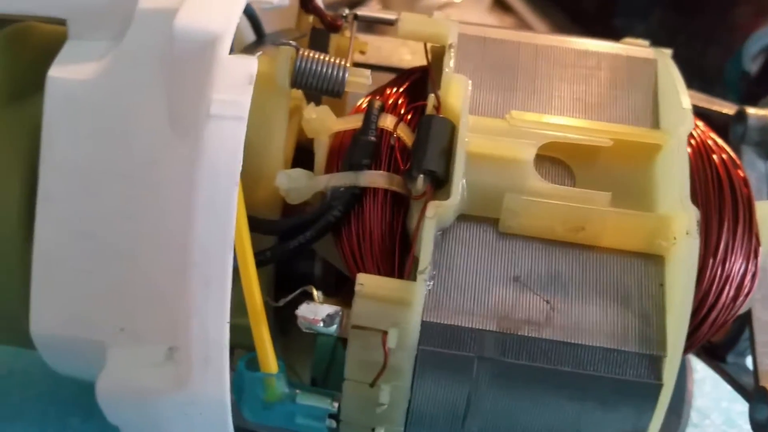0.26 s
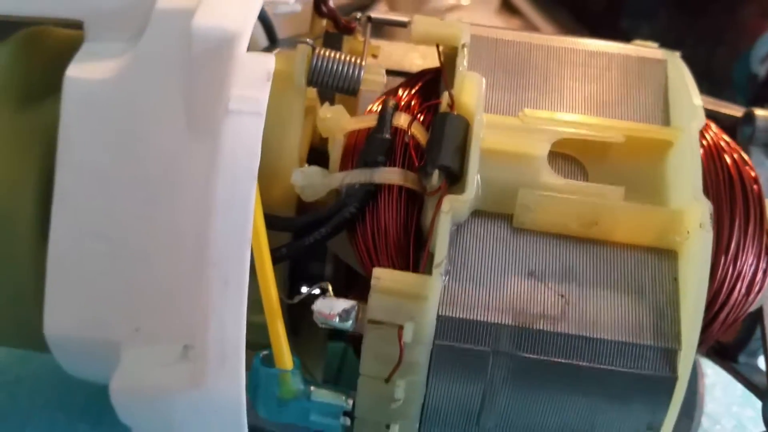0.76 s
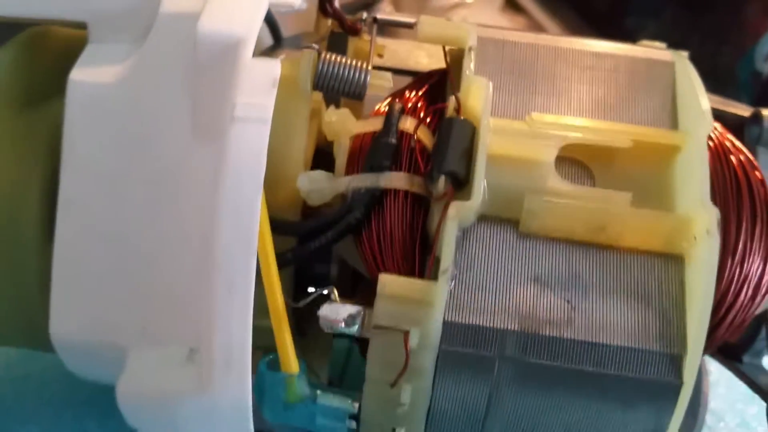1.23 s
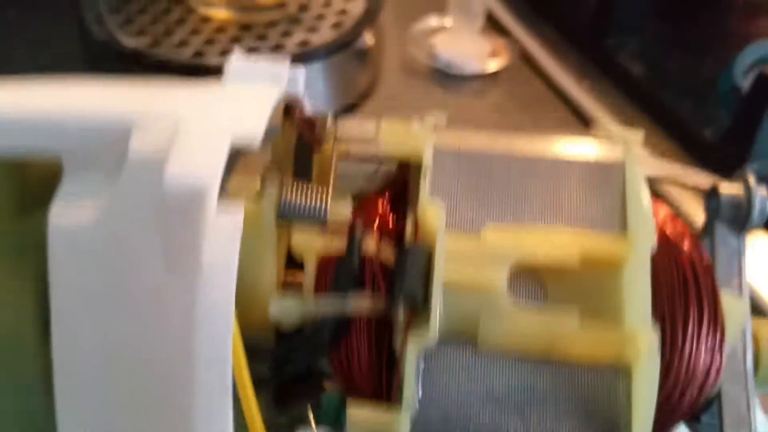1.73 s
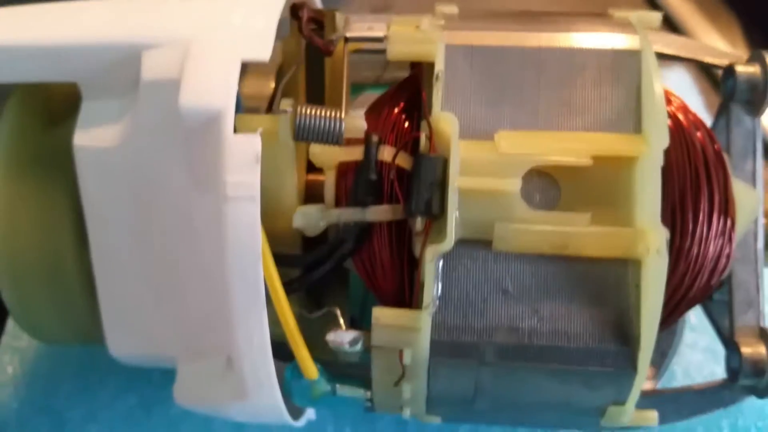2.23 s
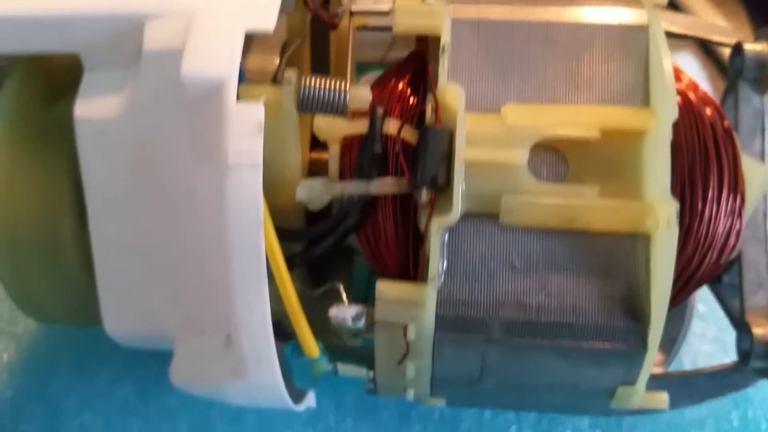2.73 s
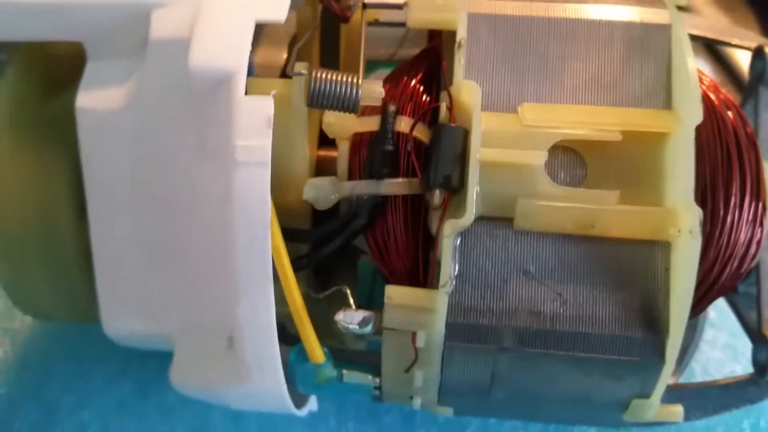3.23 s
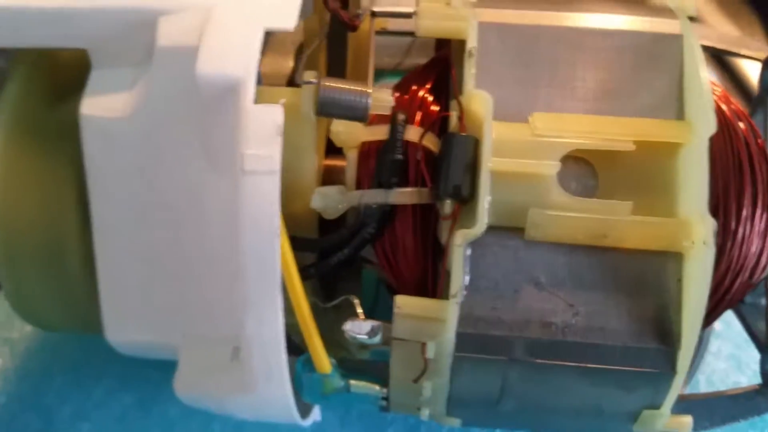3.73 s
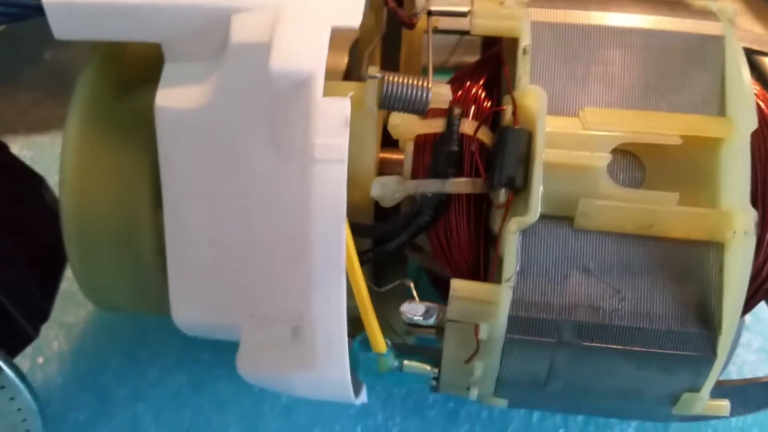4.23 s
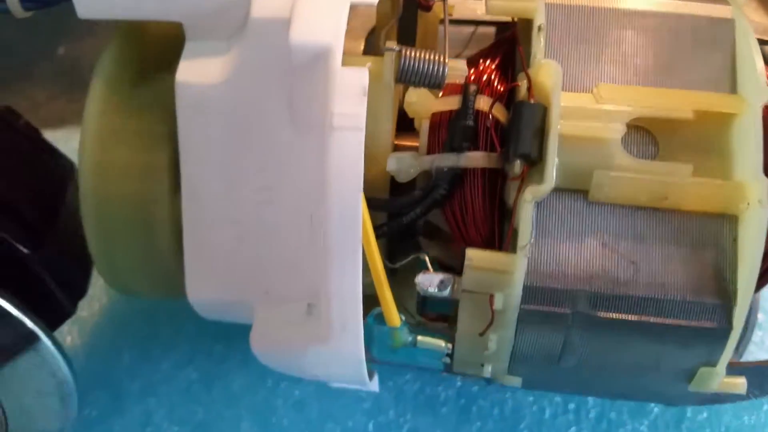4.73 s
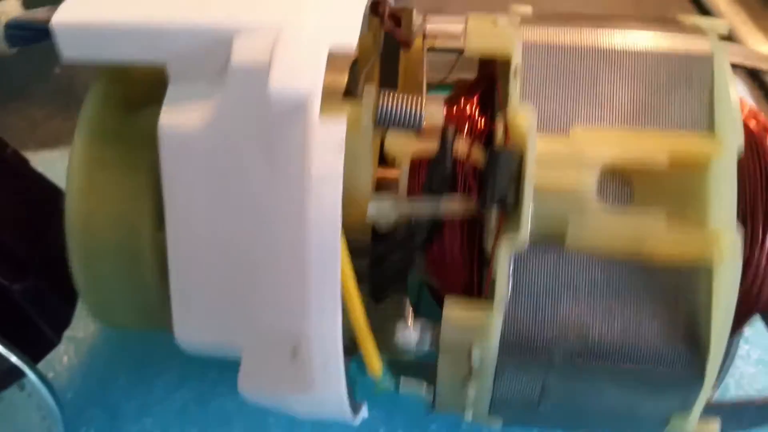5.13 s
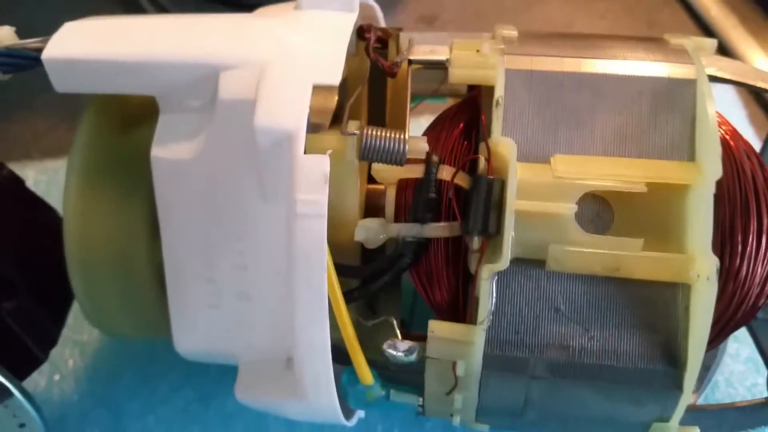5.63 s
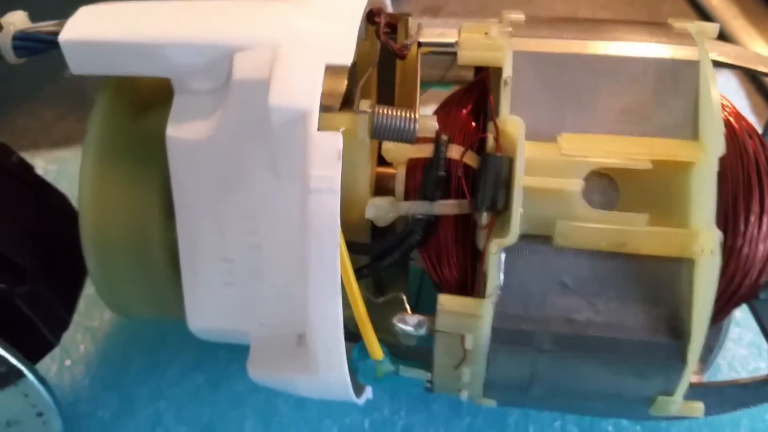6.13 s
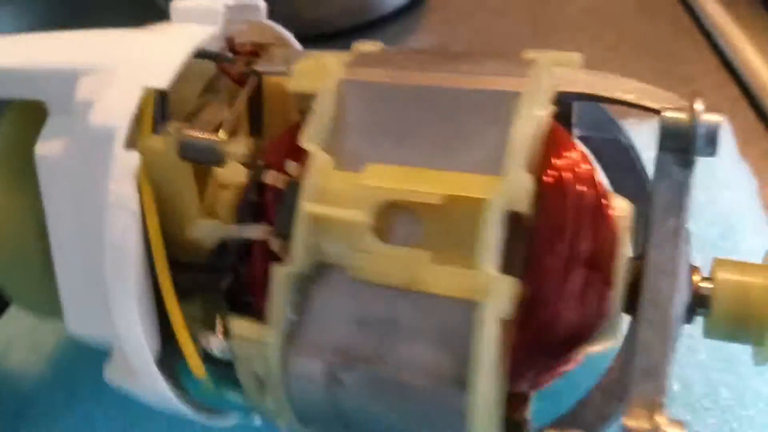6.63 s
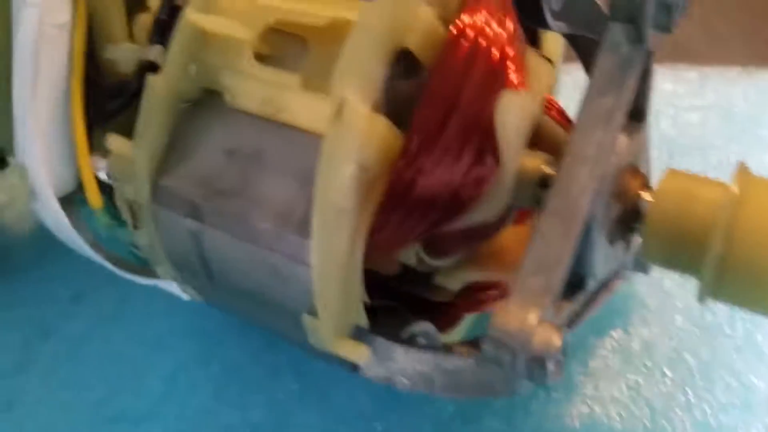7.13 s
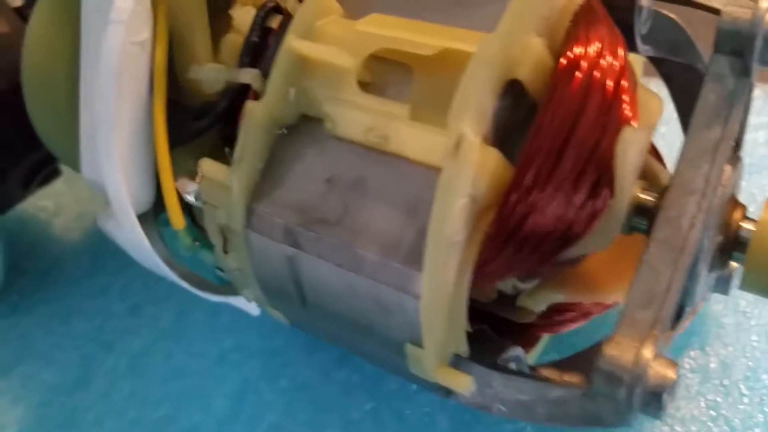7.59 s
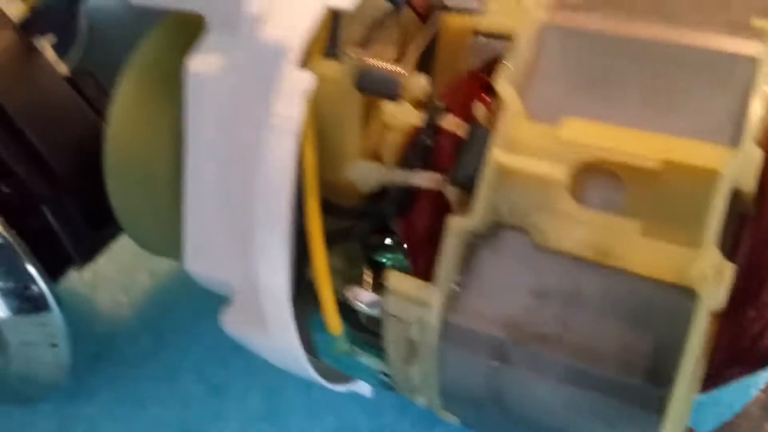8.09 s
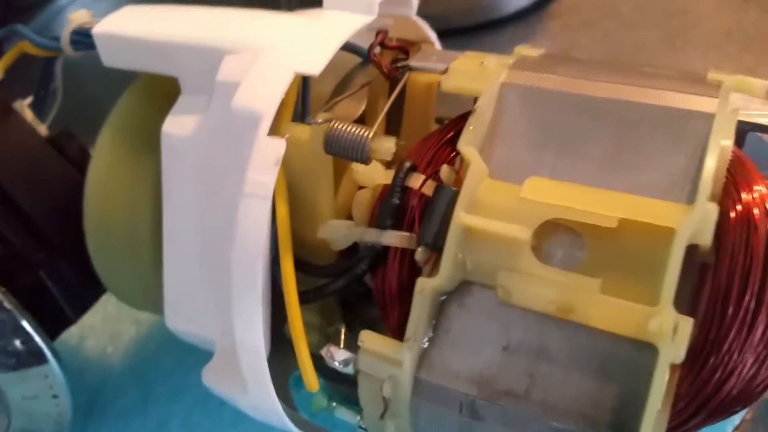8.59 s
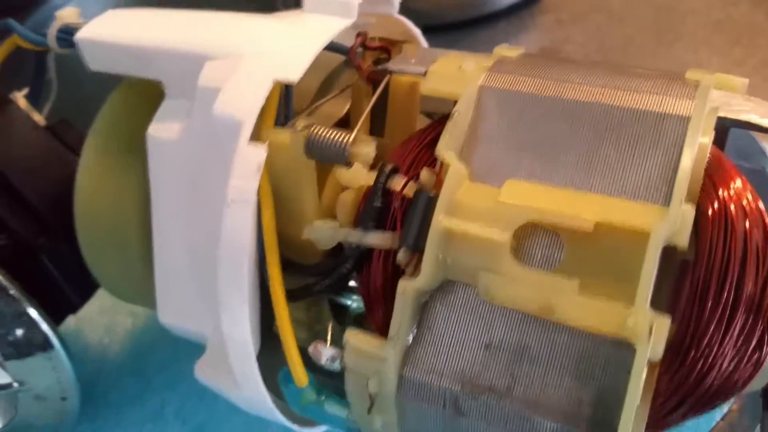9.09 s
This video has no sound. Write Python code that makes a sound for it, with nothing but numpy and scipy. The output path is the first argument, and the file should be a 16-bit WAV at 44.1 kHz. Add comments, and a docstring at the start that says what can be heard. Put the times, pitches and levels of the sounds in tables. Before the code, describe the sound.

A bare mixer brush motor on a table indoors, very close on the left; the right has only faint leakage and hiss. From 0 to 0.6 s a clear whine glides downward, with short bright sizzles and two early puffs of air. Around 0.6 s, after two brief false bites, it catches into a harsh rattle at 100 knocks a second, with hum, gritty brush-holder chatter, sparse treble spark snaps and occasional hard knocks. At 3.3 s power cuts: a softer whine falls away while brushes rub unevenly, slowing almost to a stop with a faint squeak. Two switch clicks near 4.7 s bring the rattle back, its whine rising until about 6 s. Sparks cluster around 6.3-6.5 s. From 6.6 to 7.7 s, near the shaft end, a steadier, fuller buzz dominates; then looser rattling returns beside the brushes, with knocks, sparks and growing air gusts from 8.5 s until the running motor is cut off around 9.4 s.

```python
"""A falling whine, with sizzles and gusts: a bare mixer brush motor on a table indoors, close on the left.
The commutator whines at its segment rate; once the mains pulses catch the rotor, its knocks rattle frame,
holders and brushes 100 times a second, at times locking into a steady buzz. Sparks, jolts and air join in.
Switched off, it winds down with brushes rubbing, then restarts after two switch clicks.
Whine, hum and buzz are sums of partials; the rest is mostly filtered noise shaped by envelopes."""
import sys
import numpy as np
from scipy import signal
from scipy.fft import rfft, irfft, next_fast_len
from scipy.io import wavfile
from scipy.ndimage import uniform_filter1d, map_coordinates

SR = 44100
rng = np.random.default_rng(int(sys.argv[2]) if len(sys.argv) > 2 else 0)


def generate_wav(signal):
    """Clip the signal to [-1, 1] and save it as 16-bit WAV at the path in sys.argv[1]."""
    frames = np.transpose(np.atleast_2d(signal))
    scaled = np.clip(frames, -1, 1) * 32767
    pcm = np.round(scaled).astype(np.int16)
    wavfile.write(sys.argv[1], SR, pcm)


N = 412335
T = np.arange(N) / SR  # s

# All levels are relative, ahead of later gains.
PULSE_HZ = 100.06  # mains pulse rate
SEGMENTS = 24  # commutator segments per turn
OFF_S, ON_S = 3.292, 4.75
CATCH_S, CATCH_RISE_S = .618, .028  # grip complete, rise ahead of it
FREE_HZ, FREE_SLOWING_S = 1997, 2.1  # segment rate at the start, time constant
COAST_HZ, BRAKE_HZ_PER_S = 967, 628  # segment rate at switch-off, constant friction
FREE_RATTLE_DB, FREE_CHATTER_DB, FREE_HISS_DB = -36.5, -39, -42.5
SURGE_DB = .8
HUM_WAVER = .16
BUZZ_FLUTTER_PER_ORDER = .006
AIR_DB = -57
EDGE_HZ = 15950

# microphone position: time_s, place (0 beside the brushes, 1 at the shaft end)
PLACE = [(6.5, 0), (6.62, 0.47), (6.8, 0.73), (6.95, 0.96), (7.62, 0.86), (8.2, 0.04)]
# rotor under load: time_s, segment_rate_hz, whine_db
LOADED = [(.6, 1510, -43), (.9, 1280, -31), (1.3, 1022, -55), (3.3, 968, -42), (4.75, 97.4, -54),
          (5.1, 852, -34), (5.9, 1261, -31.5), (6.3, 1321, -35), (7.6, 1295, -28), (8.15, 1435, -33),
          (9.35, 1331, -35.5)]
# mains pulses bite briefly and let go: start_s, length_s, grip (0-1)
FALSE_BITES = [(0.497, 0.041, 0.43), (0.553, 0.034, 0.62)]
# how exactly each pulse repeats the last, once caught: time_s, steadiness (0-1)
STEADY = [(.75, 0.26), (1.15, 0), (1.55, 0.48), (1.7, 0.1), (2.65, 0.17), (5.1, 0.1), (5.65, 0.15),
          (5.9, 0.35), (6.3, 0.58), (6.55, 0.29), (6.64, 0.7), (7.6, 0.66), (7.72, 0.33), (8.5, 0.18),
          (9.25, 0.03)]
# knocks in one pulse cycle, main one first: place (0-1 cycle), decay_s, rattle_db, chatter_db, hiss_db
KNOCKS = [(.5, .0024, -7, 2.5, 2), (.58, .0016, 1, -1.5, 2), (.85, .001, -6, -7, -1),
          (.95, .0009, 6, -5, -5), (.16, .001, -20, -8, -1), (.29, .0008, -1, -11, -14)]
# knocking before the stop: time_s, rattle_db (frame), chatter_db (holders)
FIRST_RUN = [(0.62, -24, -25), (0.79, -20.5, -21), (0.83, -23.5, -24), (1.38, -27, -26), (1.65, -26, -26),
             (1.66, -29, -27), (1.95, -28, -26.5), (3.28, -28.5, -26)]
# knocking after the restart: time_s, rattle_db (frame), chatter_db (holders)
SECOND_RUN = [(4.79, -24.5, -25), (4.89, -25.5, -21), (4.93, -25, -25), (5.61, -26.5, -24),
              (6.02, -31, -26.5), (6.04, -27, -24.5), (6.43, -31, -26.5), (6.98, -31, -23.5),
              (7.62, -29, -22.5), (7.82, -27.5, -23), (8.14, -26.5, -23.5), (8.25, -30.5, -27),
              (9.33, -33.5, -28.5)]
# whine partials, running free: segment_rate_multiple, level_db
GLIDE_ORDERS = [(1, -5), (2, -2), (3, -3), (4, 8), (5, 7), (6, 4), (8, 0)]
# whine partials, coasting: segment_rate_multiple, level_db
COAST_ORDERS = [(1, -2), (2, -1), (2.5, -15), (3, -5), (4, -5.5), (5, -5.5), (6, -5.5), (7, -4.5),
                (7.2, -15), (7.6, -12), (8, -6), (9, -8), (10, -3)]
# whine partials, under load: segment_rate_multiple, level_db
LOADED_ORDERS = [(1, -6), (2, -5.5), (3, -13), (4, -31)]
# coasting whine emerges, then fades: time_s, level_db
COAST_WHINE = [(3.3, -51), (3.45, -53.5), (3.63, -52.5), (3.8, -53.5), (3.95, -60), (4.3, -63), (4.7, -65)]
# how well the housing radiates the free whine: frequency_hz, level_db
HOUSING = [(150, -24), (850, -3.5), (1400, 4), (1850, -2.5), (2300, 4), (3000, 6), (3400, 3.5), (3780, -6),
           (4000, 2.5), (4400, -13), (4950, 5.5), (5500, -4.5), (5800, -2), (6100, -21), (6900, -17),
           (7500, -18), (8000, -24), (12000, -25)]
# the same when only the brushes drive it: frequency_hz, level_db
COAST_COLOUR = [(150, -26), (600, -9), (900, -5.5), (1200, -1), (1600, -3), (1740, -5), (1950, -8),
                (2150, 8), (2700, 0), (3350, 6), (3550, -4), (3800, 1), (4250, -2), (4500, -6), (5600, -1),
                (6200, -12), (12000, -28)]
# ring of the frame: frequency_hz, level_db
FRAME = [(100, -43), (250, -15.5), (400, -17), (520, 0.5), (610, -3), (690, -3.5), (830, 3.5), (1100, -1.5),
         (1380, 2.5), (1600, 2), (1850, -10.5), (2300, -5.5), (4000, -29.5)]
# ring of the brush holders: frequency_hz, level_db
HOLDERS = [(1200, -42.5), (1900, -3), (2300, -3), (2600, -4.5), (3050, -2), (3500, -4.5), (3850, -2),
           (4400, -7), (4800, -6.5), (5350, -3), (6100, -16), (9000, -67)]
# ring of the brushes: frequency_hz, level_db
BRUSHES = [(3500, -55), (6000, 0), (6700, 4), (8100, 1.5), (9200, 4), (10700, 0), (12000, -1), (14000, -5),
           (16000, -3)]
# ring that stands out as the microphone moves: time_s, frequency_hz, level_db
NEAR_RING = [(0, 3080, -26), (.7, 2940, 0), (1.8, 2840, 0), (3.2, 2870, -2.5), (4.8, 3014, 3),
             (5.5, 2850, 0.5), (5.9, 3070, -9), (6.45, 3170, -0.5), (6.56, 4120, -1), (6.68, 4100, 5),
             (6.78, 3620, -2), (7.25, 3700, -2), (7.6, 3860, -1), (8.05, 3770, 4), (8.4, 3720, -8)]
# modes of the brush holders: frequency_hz, level_db, t60_s
CLACK_MODES = [(2362, 5, 0.015), (2510, 3.5, 0.012), (3130, -2.5, 0.023), (3430, -16, 0.012),
               (3770, -1, 0.0072), (4125, -4.5, 0.015), (5450, -5, 0.0052)]
# gusts on the microphone: start_s, length_s, level_db
GUSTS = [(0.058, 0.071, -42), (0.118, 0.04, -38), (8.48, 0.04, -57), (8.537, 0.028, -38.5),
         (8.565, 0.11, -49), (8.685, 0.052, -48), (8.788, 0.17, -46), (9.005, 0.095, -38.5),
         (9.105, 0.04, -33), (9.142, 0.07, -31), (9.205, 0.1, -37.5), (9.333, .04, -25.5)]
# air on the microphone: frequency_hz, level_db
DRAUGHT_COLOUR = [(20, -21), (80, 3.5), (160, 1), (350, -3.5), (700, -6), (2000, -67)]
# still room, also the right channel's hiss: frequency_hz, level_db
AIR_COLOUR = [(20, -13), (80, -1.5), (160, -4.5), (300, 2.5), (800, -3), (2000, -5.5), (6000, -17),
              (16000, -29)]
# short sizzles of the brushes: start_s, peak_db
SIZZLES = [(0.189, -16.5), (0.2014, -22), (0.2144, -19.5), (0.2965, -20), (0.342, -16), (0.366, -17),
           (0.399, -20), (0.4179, -18), (0.5614, -16), (3.6212, -30), (3.803, -38), (3.908, -39),
           (4.013, -41), (4.396, -50), (4.41, -51), (4.492, -51)]
# sizzle spectrum: frequency_hz, level_db
SIZZLE_COLOUR = [(3500, -32), (5400, 10), (6200, 0), (8500, -0.5), (10400, 3.5), (12500, -7), (15000, -4),
                 (16000, -1.5)]
# frame partials: pulse_rate_multiple, brush_side_db, halfway_db, shaft_end_db
BUZZ = [(5, -43, -43.5, -52.5), (6, -38, -38, -42.5), (7, -43, -40, -41), (8, -39, -44.5, -42.5),
        (9, -42, -38.5, -34.5), (10, -45.5, -47, -43), (11, -39.5, -54, -50), (12, -47, -46.5, -44.5),
        (13, -53, -44, -38), (14, -41.5, -46, -38), (15, -43.5, -39, -42), (16, -42, -47, -38.5),
        (17, -56, -39, -46), (18, -49, -44, -43), (19, -63, -54, -44), (20, -56, -35, -42.5),
        (21, -66, -52, -37), (22, -49, -37, -44), (23, -39, -41, -36.5), (24, -67, -55, -51),
        (25, -45, -36, -44), (26, -38, -39, -52), (27, -61, -46, -51), (28, -71, -54, -50),
        (29, -50, -43, -50), (30, -51, -41, -51), (31, -48, -42, -49), (32, -79, -57, -54),
        (33, -62, -46, -40), (34, -62, -46, -49), (35, -62, -53, -50), (36, -62, -30, -42),
        (37, -53, -50, -37), (38, -55, -41, -39.5), (39, -56, -52, -43.5), (40, -43, -54, -49),
        (41, -58, -53, -44), (42, -49, -58, -55), (43, -58, -45, -47), (47, -62, -43, -47),
        (48, -60, -52, -44), (51, -74, -54, -45), (52, -65, -56, -54), (53, -75, -59, -53),
        (55, -54, -58, -54)]
# stator hum: time_s, level_db at the pulse rate, level_db at twice it
HUM = [(.6, -55, -47), (1.6, -57.5, -56), (2.4, -71.5, -54.5), (3.3, -73, -53), (4.8, -64, -49),
       (5.3, -59.5, -58.5), (6.4, -61.5, -55), (7, -63, -47.5), (8.1, -63.5, -49.5), (8.4, -67, -56)]
# hum overtones against the rattle: pulse_rate_multiple, level_db
HUM_ORDERS = [(3, -24), (4, -24.5)]
# hard knocks of the rotor: start_s, peak_db
JOLTS = [(0.777, -7), (0.795, -3), (1.792, -7), (2.062, -6), (3.163, -10), (4.7514, -4), (5.111, -9),
         (5.7306, -3), (8.721, -3), (8.73, -8), (8.77, -10), (8.79, -13), (8.889, -6), (9.2295, -8)]
# jolt spectrum: frequency_hz, level_db
JOLT_COLOUR = [(300, -63), (800, -15), (1800, -2), (2400, 6), (3200, 4.5), (4500, 0), (5500, -5),
               (7000, -9), (16000, -26)]
# single large brush sparks: start_s, peak_db, brightest_hz
SPARKS = [(0.8545, -11, 15000), (1.1343, -22, 14900), (1.3942, -21, 14300), (1.6735, -11, 13000),
          (1.714, -18, 15500), (2.1725, -17, 15700), (2.2433, -21, 14200), (2.2736, -20, 14300),
          (2.4633, -18, 14300), (2.6738, -19, 12800), (2.9932, -22, 14300), (5.2515, -13, 14600),
          (5.2809, -21, 12500), (5.471, -19, 14400), (5.5707, -16, 15300), (5.7316, -20, 14300),
          (5.7615, -20, 14500), (5.8905, -17, 15600), (5.9614, -21, 14500), (5.9708, -16, 14600),
          (5.9814, -18, 13000), (5.9914, -18, 13000), (6.2512, -22, 13200), (6.2612, -23, 13000),
          (6.2712, -21, 13000), (6.2812, -23, 13000), (6.2912, -23, 13000), (6.3012, -21, 13000),
          (6.4011, -22, 13000), (6.421, -18, 12900), (6.4311, -20, 12900), (6.4408, -16, 13000),
          (6.451, -11, 13000), (6.4611, -18, 12900), (6.4911, -21, 12500), (6.5711, -25, 13500),
          (7.9593, -17, 15200), (8.0497, -21, 14500), (8.099, -14, 15600), (8.2102, -18, 13200),
          (8.26, -16, 14340), (8.31, -23, 15200), (8.3597, -16, 12900), (8.48, -20, 12700),
          (8.5594, -10.5, 14500), (8.7196, -19, 12900), (8.8395, -22, 13900), (8.8787, -19, 14000),
          (8.958, -18, 12700), (9.1287, -16, 14100), (9.199, -17, 12700), (9.2284, -13, 14300),
          (9.3082, -11, 15660)]
# spark spectrum: brightest_hz_multiple, level_db
SPARK_COLOUR = [(.1, -35), (.2, -20), (0.401, -18), (.55, -28), (.92, 0), (1, 5), (1.2, 0.5)]
# brushes rubbing with the power off: frequency_hz, level_db
RUB_COLOUR = [(200, -27), (500, -13), (850, -3.5), (1100, -11), (1450, -5.5), (1850, -16.5), (2300, -4),
              (2650, -2.5), (3100, 2.5), (3500, -11), (3900, -1.5), (4700, -8.5), (5400, -8), (6200, -15.5),
              (8000, -19), (10000, -15.5), (14000, -25)]
# brush swish once a turn: frequency_hz, level_db
SWISH_COLOUR = [(6500, -30), (8700, -1), (10600, 0), (12500, -14), (16000, -18)]
# switch clicks: start_s, peak_db, ring_hz, ring_db
SWITCH = [(4.673, -27, 2270, -12), (4.698, -21.5, 2510, -1)]
# switch spectrum: frequency_hz, level_db
SWITCH_COLOUR = [(200, -6), (700, 0.5), (3500, -1), (6500, -9), (16000, -8)]
# room decay: frequency_hz, t60_s
ROOM_T60 = [(150, 0.033), (1000, 0.1), (4000, 0.64), (14000, 0.4)]


def amp(db):
    """Decibels to gain."""
    return 10 ** (np.asarray(db) / 20)


def unit(x):
    """Scales to rms 1."""
    return x / np.sqrt(np.mean(x ** 2) + 1e-20)


def evened(x):
    """Holds the slow mean power at 1."""
    return x / np.sqrt(uniform_filter1d(x ** 2, size=8820) + 1e-9)


def read(points, hz):
    """Reads a spectrum on a log-frequency axis."""
    f, value = np.transpose(points)
    return np.interp(np.log(hz + 1), np.log(f), value)


def curve(rows, axis=1):
    """One table column, joined by straight lines in time."""
    rows = np.array(rows)
    return np.interp(T, rows[:, 0], rows[:, axis])


def gains_of(orders):
    """Rows of (multiple, dB) as (multiple, gain)."""
    return [(order, amp(db)) for order, db in orders]


def wander(hz):
    """Smooth noise of rms 1, up to about hz."""
    size = next_fast_len(N, True)
    f = np.fft.rfftfreq(size, 1 / SR)
    spectrum = rfft(rng.standard_normal(size)) * np.exp(-(f / hz) ** 2)
    return unit(irfft(spectrum, size)[:N])


def colour(x, points, size=4096):
    """Minimum-phase filter with the given spectrum: each click rings after it strikes."""
    log_gain = np.log(amp(read(points, abs(np.fft.fftfreq(size, 1 / SR)))))
    taps = np.fft.ifft(np.exp(np.conj(signal.hilbert(log_gain)))).real
    return signal.oaconvolve(x, taps[:size // 2])[:len(x)]


def resonate(x, hz, width_hz):
    """A resonance of gain 1 that follows the curve hz."""
    turn = np.exp(2j * np.pi * np.cumsum(hz) / SR)
    r = np.exp(-np.pi * width_hz / SR)
    return 2 * (turn * signal.lfilter([1 - r], [1, -r], x / turn)).real


def stack(orders, hz, flutter, flutter_hz, phases=None, flutter_per_order=0):
    """Partials (multiple, gain) on a pitch curve, each wavering in level and phase; gain 1 is about rms 1."""
    turns = np.float32(np.cumsum(hz * np.ones(N)) / SR % 10)
    out = np.zeros(N)
    knots_s = np.arange(0, N / SR + 1, 1 / flutter_hz)
    for order, gain in orders:
        depth = flutter + flutter_per_order * order
        draws = depth * rng.standard_normal((2, 4096))
        level, phase = (np.interp(T, knots_s, v[:len(knots_s)]) for v in draws)
        start = 2 * np.pi * rng.random() if phases is None else phases[round(order)]
        angle = np.float32(2 * np.pi * round(order, 1) * turns + start + phase)
        out += gain * (1 + level) * np.cos(angle)
    return np.sqrt(2) * out


def add(mix, s, sound):
    """Mixes a sound in at time s."""
    part = mix[max(round(s * SR), 0):][:len(sound)]
    part += sound[:len(part)]


def burst(points, decay_s, size=3000):
    """A dying puff of coloured noise with peak 1."""
    puff = colour(rng.standard_normal(size) * np.exp(-np.arange(size) / SR / decay_s), points)
    return puff / abs(puff).max()


def powered():
    """1 while the motor is powered, 0 while it is off."""
    return uniform_filter1d(1. * ((T < OFF_S) | (T > ON_S)), size=64)


def caught():
    """0 while the rotor runs free, 1 once the mains pulses bite for good."""
    trials = sum(grip * ((T > start) & (T < start + length)) for start, length, grip in FALSE_BITES)
    held = np.clip((T - CATCH_S) / CATCH_RISE_S + 1, 0, 1)
    return np.clip(held + uniform_filter1d(trials, size=256), 0, 1)


def at_shaft_end():
    """0 with the microphone beside the brushes, 1 at the shaft end."""
    return np.clip(curve(PLACE), 0, 1)


def speed():
    """Commutator segments passing per second: free glide, under load, coasting, under load again."""
    free = FREE_HZ * np.exp(-T / FREE_SLOWING_S)
    coast = np.maximum(COAST_HZ - BRAKE_HZ_PER_S * (T - OFF_S), 1)
    return np.select([T < CATCH_S, (T > OFF_S) & (T < ON_S)], [free, coast], curve(LOADED))


def mains_pulses(steady):
    """One envelope per knock; a loose rotor strikes early or late, hard or soft."""
    jitter_s, uneven_db, lopsided_db = .0002, 1.9, .4
    cycle = np.arange(int(N / SR * PULSE_HZ))
    loose = 1 - np.interp(cycle / PULSE_HZ, T, steady)
    envelopes = []
    for place, decay_s, *_ in KNOCKS:
        late, force = rng.standard_normal((len(cycle), 2)).T
        strike_s = (cycle + place) / PULSE_HZ + jitter_s * late * loose ** 2
        at = np.clip(strike_s * SR, 0, N - 1).astype(int)
        strikes = np.zeros(N)
        # every other pulse is a little harder
        strikes[at] = amp(uneven_db * np.minimum(force, 1.4) * loose + lopsided_db * (-1) ** cycle)
        envelopes.append(signal.lfilter([1], [1, -np.exp(-1 / (SR * decay_s))], strikes))
    return np.array(envelopes)


def knocking(pulses, bed, axis):
    """Envelope of the knocks over a bed of sliding contact, with steady mean power."""
    bite = np.maximum(caught(), .04)  # pulses bite fully only once the rotor is caught
    power = bed ** 2 + bite * (amp(np.array(KNOCKS)[:, axis]) ** 2 @ pulses ** 2)
    return np.sqrt(power / uniform_filter1d(power, size=8820))


def run_levels():
    """Rattle and chatter levels in dB over both runs."""
    rows = list(FIRST_RUN) + list(SECOND_RUN)
    return curve(rows, axis=1), curve(rows, axis=2)


def drive(steady, surge_hz=16, lull_db=-8, lull_s=0.0106, hiss_db=-11, shaft_end_hiss_db=-0.5,
          slow_hiss_db=-8):
    """Gains of rattle, chatter, hiss: a loose rotor surges, slackens before each jolt; hiss needs speed."""
    rattle_db, chatter_db = run_levels()
    slow = np.maximum(1 - speed() / COAST_HZ, 0)
    brush_db = chatter_db + hiss_db + shaft_end_hiss_db * at_shaft_end() + slow_hiss_db * slow
    loaded = [rattle_db, chatter_db, brush_db]
    free = [FREE_RATTLE_DB, FREE_CHATTER_DB, FREE_HISS_DB]
    lulls = uniform_filter1d(sum(1. * ((T > s - lull_s) & (T < s)) for s, _ in JOLTS), size=64)
    uneven_db = SURGE_DB * (1 - steady) * wander(surge_hz) + lull_db * lulls
    return [powered() * amp(low + caught() * (high + uneven_db - low)) for low, high in zip(free, loaded)]


def commutator(pulses, glide_db=-35, fade_db_per_s=-7, sway_db=2, sway_hz=12, wobble=0.0035,
               coast_wobble=0.00295, loaded_db=-4):
    """Whine at the segment rate, wavering and fading in the free glide; under load mains pulses chop it."""
    hz, on = speed(), powered()
    sway = amp(sway_db * wander(sway_hz))
    free = stack(gains_of(GLIDE_ORDERS), hz * (1 + wobble * wander(75)),
                 flutter=0.12, flutter_hz=90, flutter_per_order=0.045)
    free = colour(free * amp(glide_db + fade_db_per_s * T) * (T < CATCH_S), HOUSING)
    coasting = stack(gains_of(COAST_ORDERS), hz * (1 + coast_wobble * wander(40)),
                     flutter=0.15, flutter_hz=69.8, flutter_per_order=0.049)
    coasting = colour(coasting * amp(curve(COAST_WHINE)) * (1 - on), COAST_COLOUR)
    loaded = stack(gains_of(LOADED_ORDERS), hz, flutter=0.6, flutter_hz=70.2)
    loaded = loaded * amp(loaded_db + curve(LOADED, axis=2))
    chopped = loaded * on * caught() * knocking(pulses, bed=0.82, axis=3)
    return sway * (free + coasting) + chopped


def contact(steady, grain_db):
    """Contact noise: gritty while the rotor is loose, more even when it locks to the mains."""
    grit = amp(grain_db * (1 - steady) * np.clip(wander(2000), -2, 2))
    return rng.standard_normal(N) * grit / np.sqrt(uniform_filter1d(grit ** 2, size=4410))


def clack_share(share_per_db, shaft_end_loss):
    """The more chatter stands above rattle, the more of it is one clean clack per mains pulse."""
    rattle_db, chatter_db = run_levels()
    share = share_per_db * (chatter_db - rattle_db) * (1 - shaft_end_loss * at_shaft_end())
    return np.clip(share, 0, .9)


def clack(pulses, steady):
    """The main knock strikes the brush holders; a loose rotor hits each mode with changing force."""
    strikes = np.maximum(np.diff(pulses[0], prepend=0), 0)
    t = np.arange(1500) / SR
    out = np.zeros(N)
    for hz, db, t60_s in CLACK_MODES:
        envelope = amp(db - 60 * t / t60_s) * -np.expm1(-t / .0005)  # 0.5 ms attack
        mode = envelope * np.sin(2 * np.pi * (hz * t + rng.random()))
        force = 1 + (1 - steady) * rng.uniform(-0.68, 1, N)
        out += signal.oaconvolve(strikes * force, mode)[:N]
    return evened(out)


def frame_rattle(steady, pulses, bracket_hz=1390, bracket_db=-1, bracket_width_hz=170):
    """Knocks ring the frame; at the shaft end the bearing bracket rings too."""
    frame = unit(colour(contact(steady, grain_db=0.0) * knocking(pulses, bed=0.93, axis=2), FRAME))
    hz = np.full(N, bracket_hz)
    bracket = resonate(resonate(frame, hz, bracket_width_hz), hz, bracket_width_hz)
    bracket = amp(bracket_db) * bracket * at_shaft_end() * (1 - .5 * steady)
    return frame * (1 - steady) + bracket


def holder_chatter(steady, pulses, ring_width_hz=380):
    """Brush holders mix scraping with clean clacks, with one ring standing out near the microphone."""
    share = clack_share(share_per_db=0.13, shaft_end_loss=0.88) * caught()
    scraping = contact(steady, grain_db=2.2) * knocking(pulses, bed=.33, axis=3)
    scrape = evened(colour(scraping, HOLDERS))
    holders = np.sqrt(1 - share) * scrape + np.sqrt(share) * clack(pulses, steady)
    ring = resonate(holders, curve(NEAR_RING), ring_width_hz)
    holders = evened(holders + amp(curve(NEAR_RING, axis=2)) * ring)
    return holders * (1 - steady * np.sqrt(at_shaft_end())) ** 0.51  # the repeating share is heard as buzz


def rattle(steady, pulses, gains, chatter_db=0.4, hiss_db=0.5):
    """The knocks ring the frame, the brush holders and the brushes."""
    frame_gain, chatter_gain, hiss_gain = gains
    frame = frame_rattle(steady, pulses) * frame_gain
    holders = amp(chatter_db) * holder_chatter(steady, pulses) * chatter_gain
    brushes = colour(contact(steady, grain_db=5.0) * knocking(pulses, bed=0.45, axis=4), BRUSHES)
    return frame + holders + amp(hiss_db) * unit(brushes) * hiss_gain


def air(draught_db=-67.0, fan_law=2, gust_db=2, edge_s=0.011):
    """Cooling air on the microphone, harder with rotor speed and in gusts, over the quiet of the room."""
    flow = amp(draught_db) * (speed() / COAST_HZ) ** fan_law
    for start, length, db in GUSTS:
        flow = flow + amp(db) * np.clip(np.minimum(T - start, start + length - T) / edge_s, 0, 1)
    buffet = unit(colour(rng.standard_normal(N), DRAUGHT_COLOUR) * amp(gust_db * wander(31)))
    return buffet * flow + amp(AIR_DB) * unit(colour(rng.standard_normal(N), AIR_COLOUR))


def sizzles(gain_db=-1):
    """Short sizzles of the brushes: bright noise with a 9.2 ms decay."""
    out = np.zeros(N)
    for s, db in SIZZLES:
        add(out, s, amp(db + gain_db) * burst(SIZZLE_COLOUR, decay_s=0.0092))
    return out


def struck_phases(axis, bed=0.22):
    """Phases of one cycle of puffs, each starting at its knock, so that partials arrive together."""
    size = round(SR / PULSE_HZ)
    power = bed ** 2
    for knock in KNOCKS:
        since_s = (np.arange(size) / size - knock[0]) % 1 / PULSE_HZ
        power = power + (amp(knock[axis]) * np.exp(-since_s / knock[1])) ** 2
    return np.angle(rfft(rng.standard_normal(size) * power))


def stator_hum(gain, hum_db=0.5):
    """Magnetic hum at the pulse rate and its multiples; the overtones follow the rattle."""
    low = sum(stack([(k, 1)], PULSE_HZ, HUM_WAVER, flutter_hz=12) * amp(curve(HUM, axis=k)) for k in (1, 2))
    upper = stack(gains_of(HUM_ORDERS), PULSE_HZ, HUM_WAVER, flutter_hz=9.9)
    return (amp(hum_db) * low * powered() + upper * gain) * caught()


def buzz(steady, gain, buzz_db=2.0, shaft_end_db=6.5, holders_from_hz=1900):
    """The repeating share of the knocks is a clean buzz; its partials change with microphone position."""
    place = at_shaft_end()
    orders = [(round(k), np.interp(place, [0, .5, 1], amp(levels))) for k, *levels in BUZZ]
    of_frame, of_holders = struck_phases(axis=2), struck_phases(axis=3)
    low = np.arange(len(of_frame)) * PULSE_HZ < holders_from_hz
    phases = np.where(low, of_frame, of_holders)
    frame = evened(stack(orders, PULSE_HZ, flutter=0.14, flutter_hz=14, phases=phases,
                         flutter_per_order=BUZZ_FLUTTER_PER_ORDER))
    return amp(buzz_db + shaft_end_db * np.sqrt(place) * steady) * frame * np.sqrt(steady) * gain


def spark_colour(hz):
    """The spectrum of a spark that is brightest at hz."""
    return [(multiple * hz, db) for multiple, db in SPARK_COLOUR]


def crackle(pulses, gain, crackle_db=-9, bright_hz=14300, chance=0.6, spread_db=5, decay_s=0.0012,
            full_hz=1100, shaft_end_db=-4):
    """Small sparks on some main knocks once the rotor is fast; the motor hides them from the shaft end."""
    strikes = (np.diff(pulses[0], prepend=0) > 0) * (rng.random(N) < chance)
    sizes = amp(spread_db * np.minimum(rng.exponential(size=N), 2))
    arcs = signal.lfilter([1], [1, -np.exp(-1 / (SR * decay_s))], strikes * sizes)
    sparking = unit(colour(arcs * rng.standard_normal(N), spark_colour(bright_hz)))
    fast = np.minimum(speed() / full_hz, 1) ** 2
    return amp(crackle_db + shaft_end_db * at_shaft_end()) * sparking * gain * caught() * fast


def jolts(gain_db=-5.0):
    """Hard knocks of the rotor: noise bursts with a 0.52 ms decay."""
    out = np.zeros(N)
    for s, db in JOLTS:
        add(out, s, amp(db + gain_db) * burst(JOLT_COLOUR, decay_s=0.00052))
    return out


def sparks(gain_db=3):
    """Single brush sparks: treble noise bursts, each with its own brightest frequency."""
    out = np.zeros(N)
    for s, db, hz in SPARKS:
        add(out, s, amp(db + gain_db) * burst(spark_colour(hz), decay_s=0.0019))
    return out


def rubbing(rub_db=-46.0, rub_law=0.87, high_spot=0.69, slow_swing_db=1.5, squeak_hz=10900,
            squeak_db=-70, swish_db=-61):
    """Coasting brushes scrape a surface repeating each turn, swish once a turn and squeak near the end."""
    hz, off = speed(), 1 - powered()
    turns = np.cumsum(hz * off) / SEGMENTS / SR
    left = hz / COAST_HZ  # share of switch-off speed
    pressure = np.sin(2 * np.pi * (turns + high_spot))
    swing = amp(slow_swing_db * (2.0 - left) * pressure)  # more uneven as it slows
    surface = map_coordinates(rng.standard_normal(1100), [turns % 1 * 1100], order=1, mode="grid-wrap")
    roughness = rng.standard_normal(N) + surface * np.sqrt(left) * off
    scrape = evened(colour(roughness, RUB_COLOUR)) * swing * left ** rub_law
    swish = unit(colour(rng.standard_normal(N), SWISH_COLOUR)) * np.sqrt(np.maximum(-pressure, 0))
    swish = swish * np.interp(T, [3.7, 3.95, 4.17, 4.4], [0, 1, 1, 0])
    squeak = wander(69.4) * np.sin(2 * np.pi * squeak_hz * T)
    squeak = squeak * np.interp(T, [4, 4.3, 4.6, 4.75], [0, 1, 1, 0])
    return amp(rub_db) * scrape * off + amp(swish_db) * swish + amp(squeak_db) * squeak


def switch(decay_s=0.004):
    """Switch clicks: a noise burst and a decaying sine ring."""
    out, t = np.zeros(N), np.arange(3000) / SR
    for s, db, hz, ring_db in SWITCH:
        ring = amp(ring_db) * np.sin(2 * np.pi * hz * t) * np.exp(-t / decay_s)
        add(out, s, amp(db) * (burst(SWITCH_COLOUR, decay_s=0.0029) + .5 * ring))
    return out


def room(x, first_s=0.0061):
    """A short diffuse noise tail; the bass dies first, the range near 4 kHz last."""
    hz, t, z = signal.stft(rng.standard_normal(SR // 2), SR, nperseg=256)
    decay = amp(-60 * t / read(ROOM_T60, hz)[:, None])
    tail = signal.istft(z * decay, SR, nperseg=256)[1]
    tail = tail * (np.arange(len(tail)) / SR > first_s)
    return signal.fftconvolve(x, tail / np.linalg.norm(tail))[:N]


def scene(room_db=-12, left_db=5.5, leak_db=-33, direct_leak=0.071, right_hiss_db=-72):
    """The motor in its room; the right channel carries only a faint leak and hiss."""
    steady = np.clip(curve(STEADY), 0, .97) * caught()
    pulses, gains = mains_pulses(steady), drive(steady)
    motor = commutator(pulses) + rattle(steady, pulses, gains) + sizzles()
    motor += buzz(steady, gains[0]) + stator_hum(gains[0]) + crackle(pulses, gains[2])
    motor += jolts() + sparks() + rubbing() + switch()
    sound = motor + amp(room_db) * room(motor) + air()
    leak = amp(leak_db) * (direct_leak * sound + room(motor))
    hiss = amp(right_hiss_db) * unit(colour(rng.standard_normal(N), AIR_COLOUR))
    return np.array([amp(left_db) * sound, leak + hiss])


def record(dry):
    """Full-scale limit, then a steep low-pass."""
    taps = signal.firwin(511, EDGE_HZ, window=("kaiser", 9), fs=SR)
    return signal.oaconvolve(np.clip(dry, -1, 1), taps[None], "same")


dry = scene()
out = record(dry)
generate_wav(out)
```